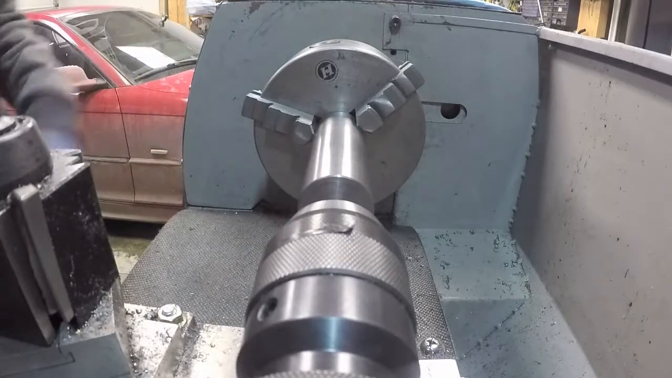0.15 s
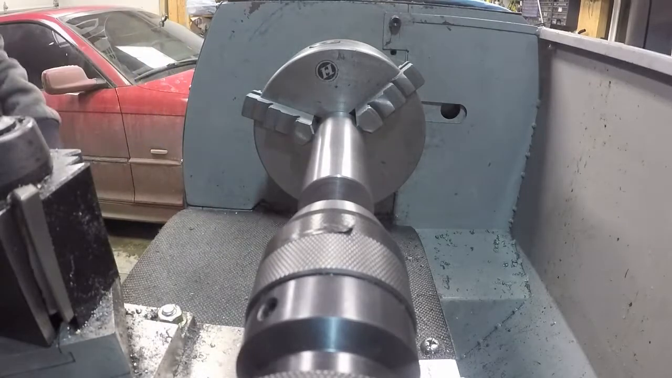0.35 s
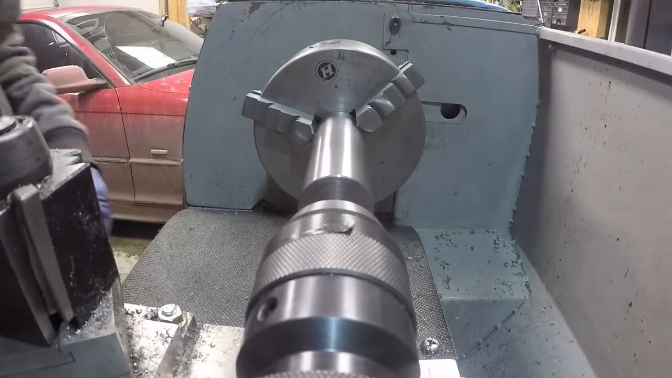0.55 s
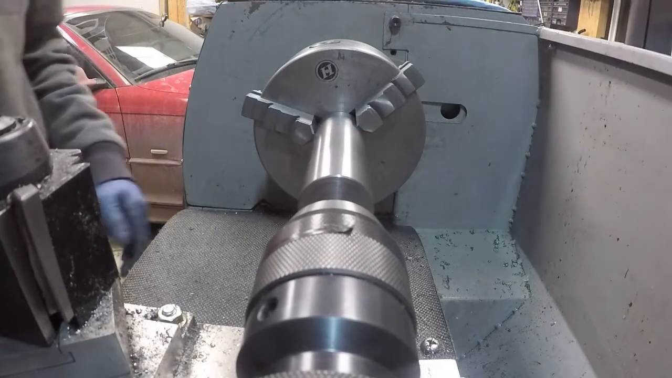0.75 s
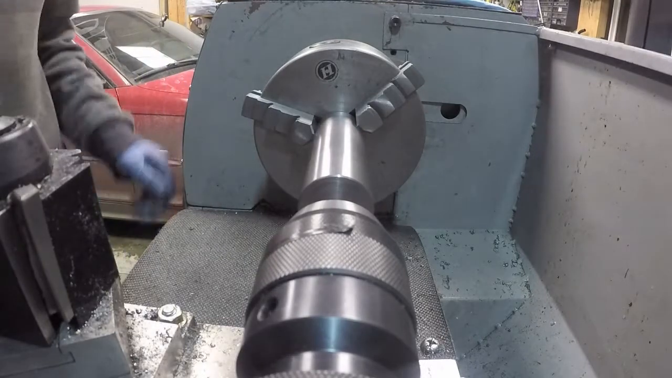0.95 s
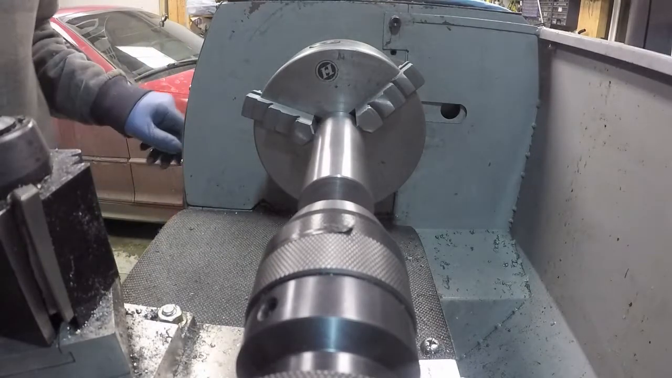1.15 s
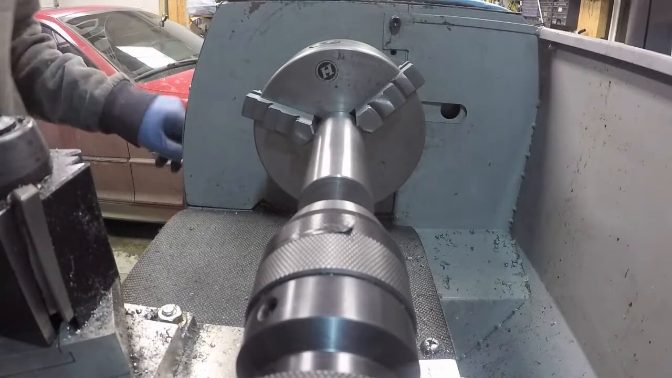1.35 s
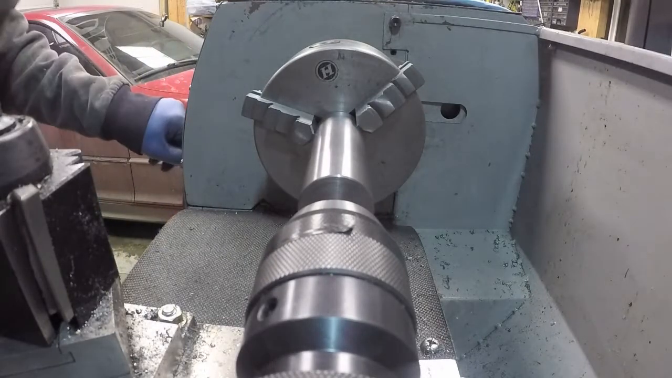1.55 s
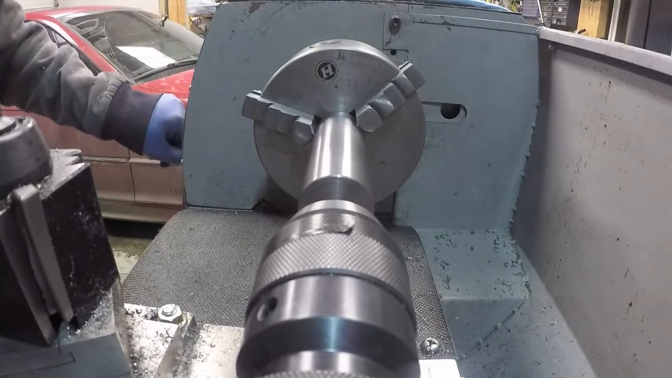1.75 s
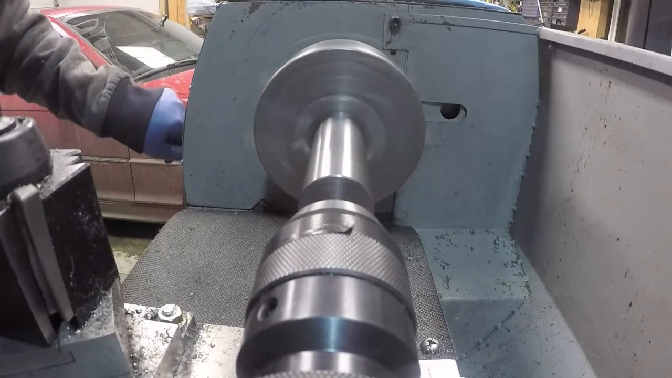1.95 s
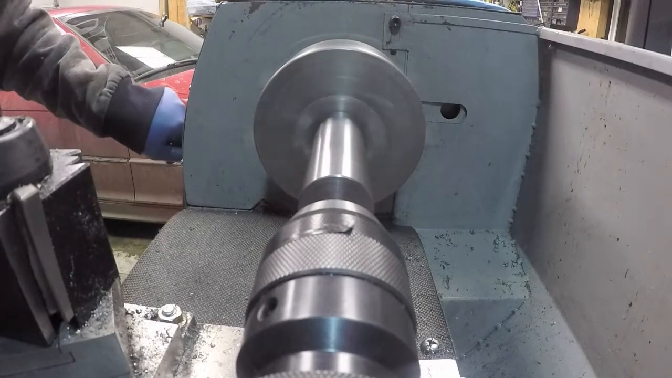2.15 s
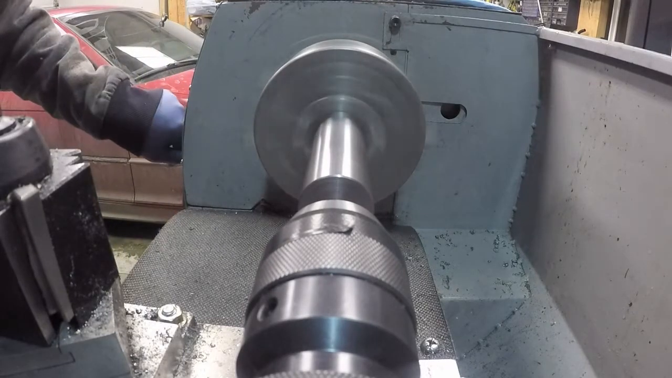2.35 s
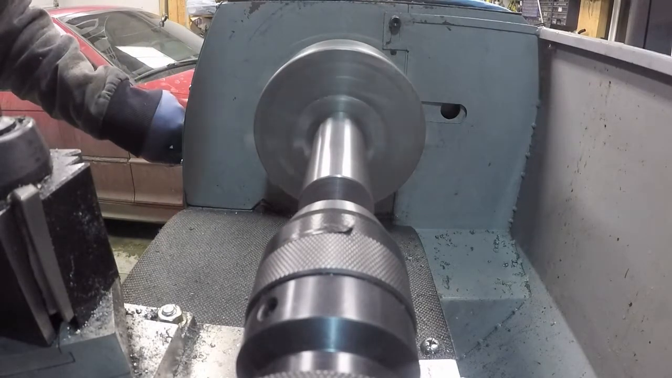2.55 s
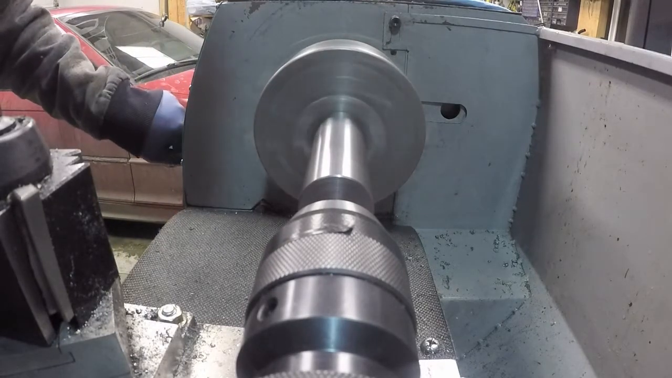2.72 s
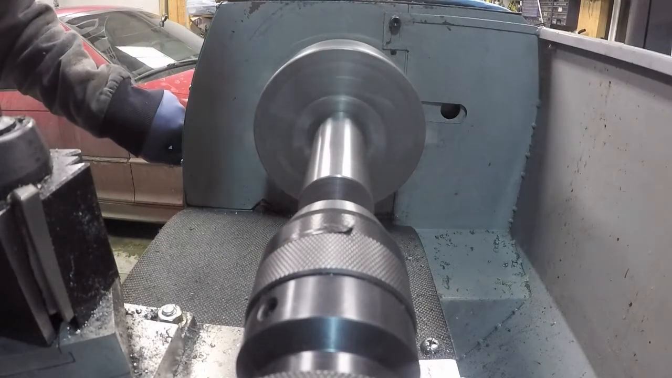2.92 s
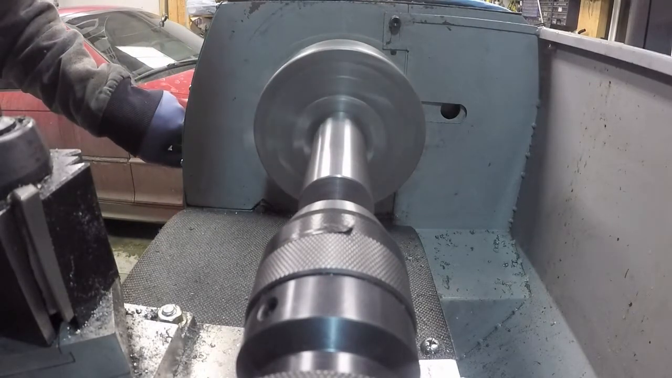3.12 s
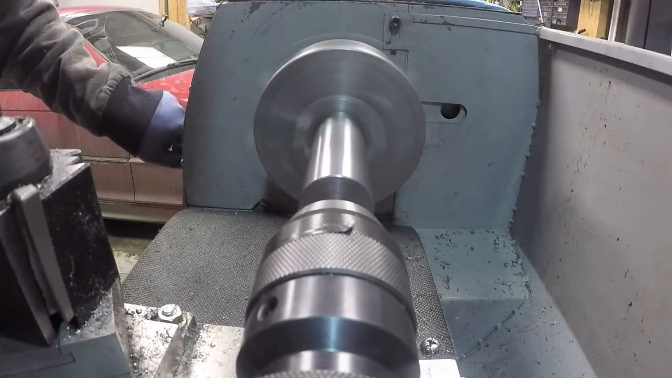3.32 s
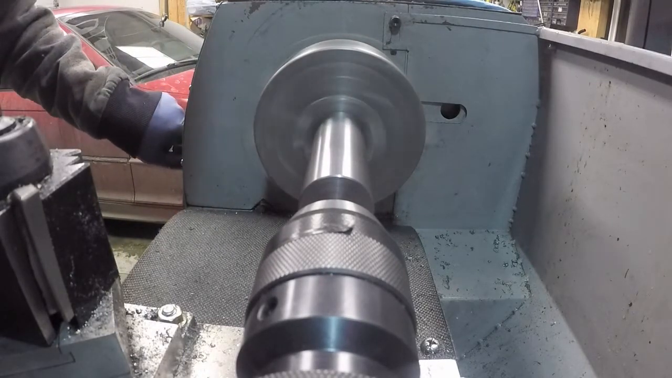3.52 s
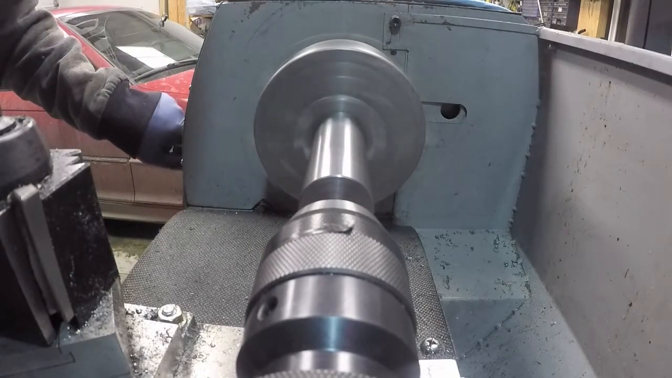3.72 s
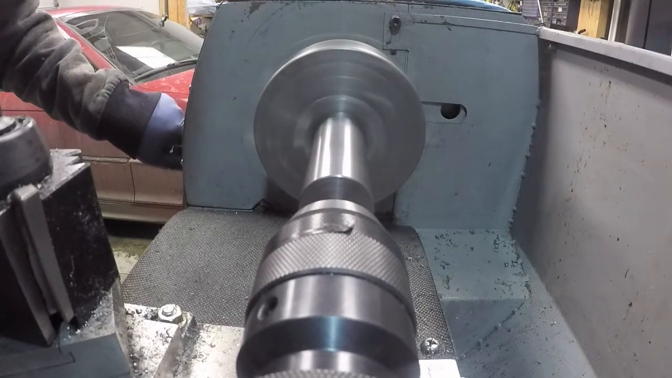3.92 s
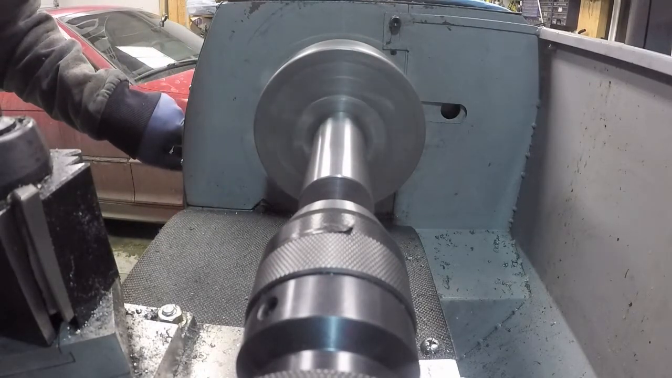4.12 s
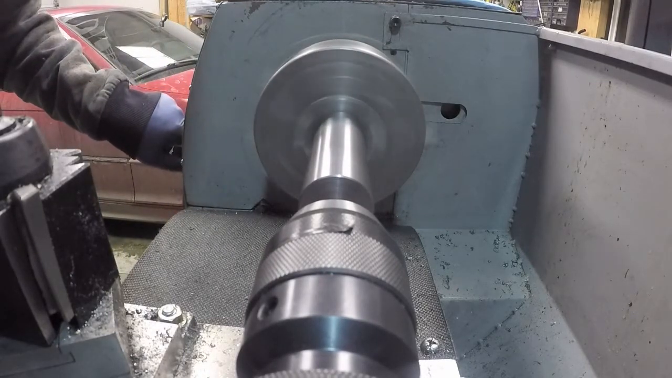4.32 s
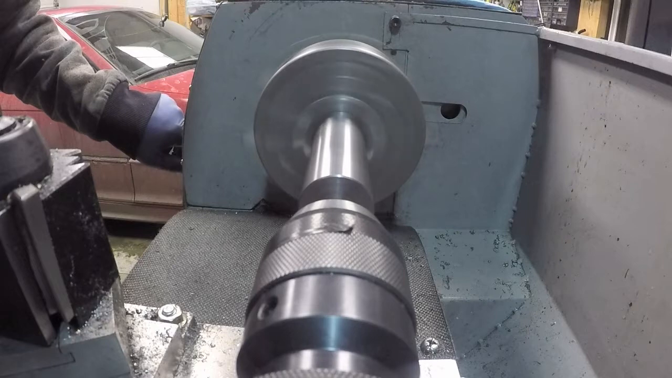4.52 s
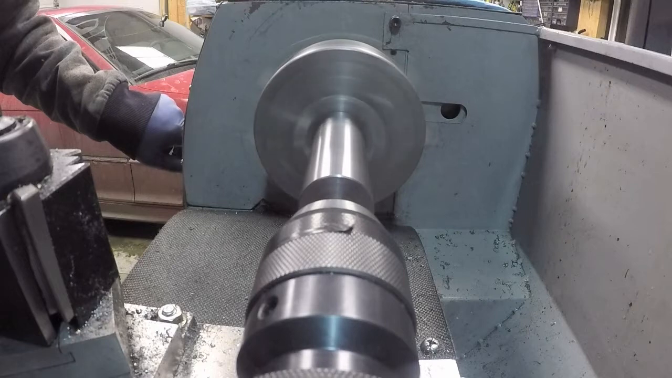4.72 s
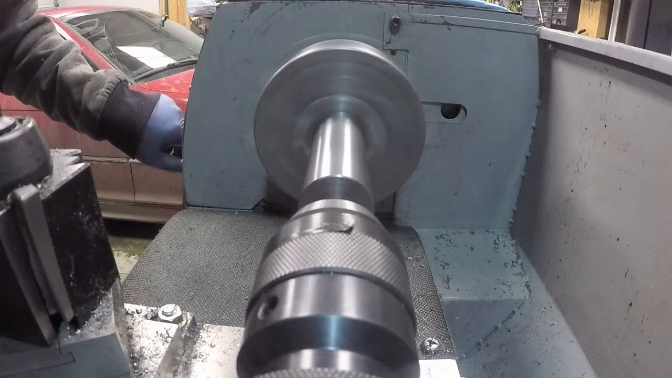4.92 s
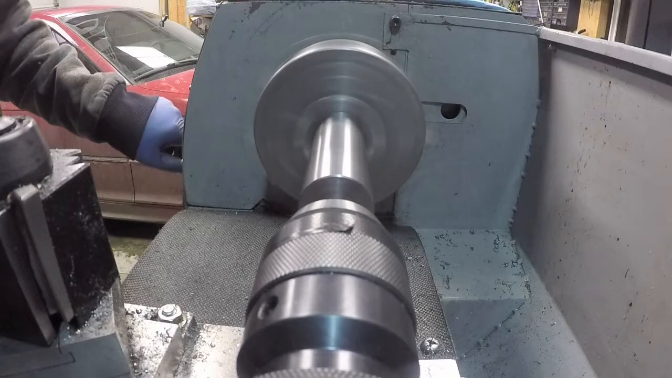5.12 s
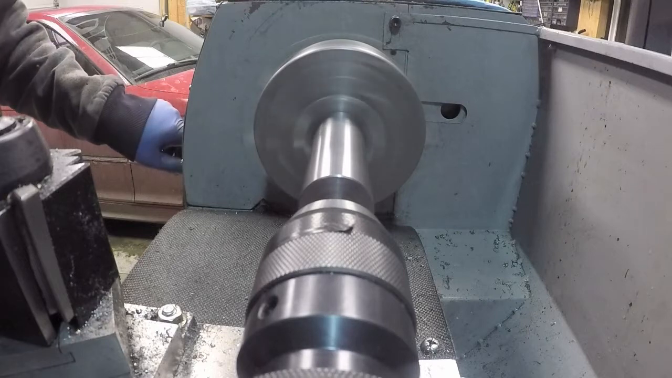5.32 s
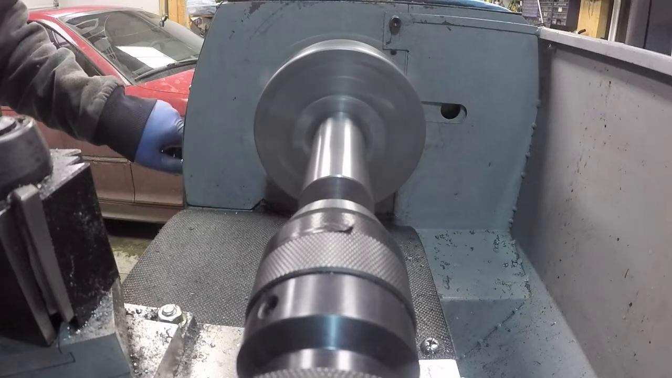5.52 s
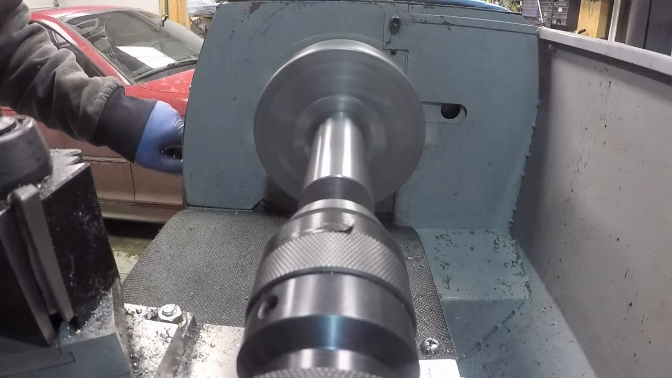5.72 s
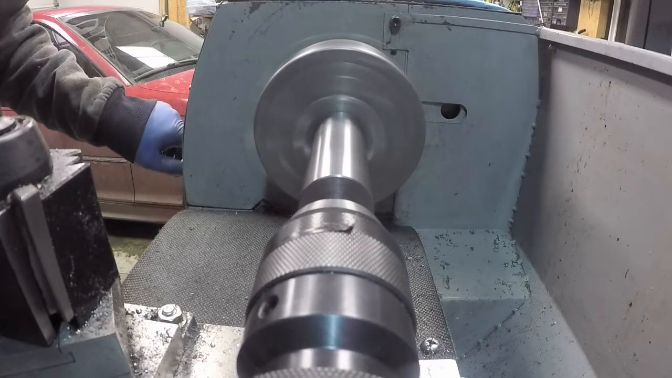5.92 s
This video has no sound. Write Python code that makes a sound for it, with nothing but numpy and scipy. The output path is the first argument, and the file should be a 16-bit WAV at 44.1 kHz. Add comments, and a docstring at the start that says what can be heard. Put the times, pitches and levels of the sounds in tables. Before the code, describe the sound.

Close mono pickup on a metal lathe indoors. First nearly two seconds of faint rumble, soft handling bumps, sleeve rustle and dry clicks. Then a sharp switch snap, a cluster of heavy steel clanks, and an abrupt run-up into a mid-low electric hum. It pulses strongly at first, becomes steadier after three seconds, and continues with grinding gear rattle and steely hiss. Scattered knocks follow, the last one hard, near the end.

```python
"""A soft bump over a low room drone, then sleeve rustle and small ticks as a hand reaches for a lathe's switch.
The switch snaps, the drive takes up its slack with a clank, and the motor is up to speed in a fifth of a second.
A drive tone throbs against the mains hum, over rattling gears, hissing bearings and a few loose knocks.
Tones are summed sines; rustle, rumble, rattle and hiss are shaped noise; knocks are decaying modes plus noise."""
import sys
import numpy as np
from scipy import signal
from scipy.fft import rfft, irfft
from scipy.io import wavfile
from scipy.ndimage import uniform_filter1d, minimum_filter1d

SR = 44100
rng = np.random.default_rng(int(sys.argv[2]) if len(sys.argv) > 2 else 0)


def unload_wav(signal):
    """Save mono or channel-first audio to the path in sys.argv[1] as 16-bit WAV at rate SR, clipped to [-1, 1]."""
    wavfile.write(
        sys.argv[1],
        SR,
        np.round(np.clip(np.atleast_2d(signal).T, -1, 1) * 32767).astype(np.int16),
    )


N = 267246
T = np.arange(N) / SR

# idle workshop spectrum: (frequency [Hz], relative density [dB])
ROOM_SPECTRUM = [(12, -24), (25, 1.5), (34, -1.5), (45, -0.5), (60, 4.5), (80, -18), (130, -19.5),
                 (200, -17.5), (450, -31), (640, -41.5), (1000, -40), (1600, -45), (3000, -44), (6000, -49),
                 (15000, -59.5)]
# sleeve cloth spectrum, also used for ticks: (frequency [Hz], relative density [dB])
CLOTH_SPECTRUM = [(150, -42), (500, -18), (900, -1.5), (1500, -8), (2000, -5.5), (2800, -3), (3900, -4.5),
                  (5500, -8), (7000, -16.5), (10000, -22), (15000, -34)]
# soft body noise spectrum: (frequency [Hz], relative density [dB])
BODY_SPECTRUM = [(65, -26), (110, -15), (140, -3), (183, 3.5), (280, -6.5), (360, -9.5), (440, -4.5),
                 (530, -8.5), (620, -20), (800, -21), (1200, -45), (2600, -68)]
# arm moves: (peak time [s], rise [s], t60 [s], sleeve rustle [dB], body noise [dB])
ARM_MOVES = [(.01, 0.027, 0.89, -72, -39.5), (.17, 0.078, 0.75, -55, -47), (.422, 0.049, 0.28, -48, -58),
             (.49, 0.078, .5, -45.5, -52), (.71, .08, .4, -62, -62), (.89, 0.12, .4, -58.5, -54),
             (.96, .06, .6, -68, -46), (1.08, .04, 0.28, -45.5, -38), (1.2, 0.16, 0.63, -71, -45),
             (1.53, 0.027, 0.44, -48.5, -45), (1.765, 0.25, 0.58, -46.5, -45.5)]
# bright ticks and scuffs at controls and drive: (time [s], level [dB], rise [s], t60 [s], tilt [dB/octave])
BRIGHT_TICKS = [(0.164, -49, 0.003, 0.07, 0), (0.4142, -41, 0.0014, 0.15, -2.5),
                (.457, -41.5, 0.0054, 0.13, 2), (.938, -54, .008, .1, 0), (1.512, -41.5, 0.0015, 0.07, -1),
                (1.543, -47, 0.0033, 0.073, 1), (1.744, -42.5, 0.0037, 0.086, 4),
                (1.8215, -30, .002, 0.12, 4.5), (1.973, -33, .015, 0.12, 8), (2.56, -38, .018, .05, 21),
                (5.446, -33, .0005, .012, 16)]
# soft bumps of the operator against the machine: (time [s], level [dB], frequency [Hz], t60 [s])
SOFT_BUMPS = [(.02, -27, 84.5, 0.24), (1.08, -33.5, 115, 0.15)]
# frame rumble spectrum: (frequency [Hz], relative density [dB])
RUMBLE_SPECTRUM = [(10, -55), (22, -21), (29, -10), (42, -8), (58, 0.5), (68, -8.5), (84, 5.5), (98, -10.5),
                   (110, 2), (135, -11), (225, -15.5), (262, -4), (290, -25.5), (500, -62)]
# gear rattle spectrum: (frequency [Hz], relative density [dB])
GEAR_SPECTRUM = [(130, -25.5), (205, -13), (280, -8), (345, 3), (400, 0), (470, 2), (510, -7), (580, -4),
                 (740, -9.5), (900, -9), (1120, -7), (1210, -20.5), (1350, -28), (6000, -76)]
# bearing hiss spectrum: (frequency [Hz], relative density [dB])
BEARING_SPECTRUM = [(700, -19), (1300, -3), (1620, -8), (1850, 2.5), (2450, -2.5), (2900, 2), (3250, -2),
                    (3650, -1.5), (4300, -3.5), (5700, -6), (6600, -12.5), (7300, -16.5), (11500, -29.5),
                    (13500, -28.5), (15500, -33)]
# steel parts ringing with the bearings: (frequency [Hz], half-width [Hz], level against the hiss [dB])
STEEL_RESONANCES = [(1826, 92, -14.5), (2293, 44, -13), (2595, 50, -10.5), (3060, 48, -13),
                    (3470, 94, -10.5), (4705, 46, -18), (5100, 10, -22), (5610, 83, -20), (6080, 33, -17),
                    (9320, 71, -29)]
# struck headstock, before each knock's focus and length: (frequency [Hz], level [dB], t60 [s])
HEADSTOCK_MODES = [(396.6, 0.5, 0.17), (448, 4.5, 0.043), (523, 2.5, 0.046), (604, 7.5, 0.032),
                   (714, 3.5, 0.049), (853, 6.5, 0.059), (948, -2, 0.043), (965, -16.5, .06),
                   (1176, -31, 0.016), (1880, -18, 0.063), (2100, -37, .04)]
# steely crack spectrum: (frequency [Hz], relative density [dB])
CRACK_SPECTRUM = [(150, -30), (400, 12), (1000, -4), (1500, -3.5), (2000, 4.5), (3200, 0.5), (4200, -7),
                  (5600, -10.5), (7000, -22), (15000, -35)]
# drive knocks: (time [s], ring [dB], ring length [factor], ring centre [Hz],
#                crack [dB], crack t60 [s], crack pitch [Hz])
DRIVE_KNOCKS = [(1.8531, -21, 1, 800, -30, .02, 1100), (1.8567, -6.5, 0.83, 440, -20, 0.05, 450),
                (1.867, -7.5, 1, 710, -14.5, 0.079, 2540), (1.8723, 0.5, 0.63, 1010, -8, 0.04, 1010),
                (1.878, -10, 0.44, 400, -16, 0.11, 2930), (1.902, -12.5, 0.42, 377, -25, 0.062, 3340),
                (2.6347, -25, .3, 900, -6, 0.0089, 2700), (2.6359, -11, 0.38, 690, -17, 0.015, 2750),
                (2.958, -16, 0.4, 745, -27, .01, 1000), (4.86, -12.5, 0.99, 600, -27, .01, 1000),
                (5.322, -14, 0.45, 696, -28, .01, 1000), (5.368, -22, .3, 700, -16, 0.019, 2190),
                (5.833, -14, 0.37, 900, -5.5, 0.0071, 4220), (5.8347, 1, 0.26, 900, -5.5, 0.032, 1880)]
# rotor tones: (order [x shaft rate], sideband [x hum rate])
ROTOR_ORDERS = [(1, 0), (2, 0), (6, 0), (7, 0), (10, 0), (11, 0), (13, 0), (14, 0), (14, 1), (12, 2),
                (12, 3), (30, -1), (30, 1), (30, 2), (30, 3), (30, 4), (30, 5)]
# rotor tones at speed, same order: (mean level [dB])
ROTOR_LEVELS_DB = [-67, -45, -49.5, -37.5, -34.5, -33.5, -30.5, -31.5, -34.5, -32.5, -43, -47, -43.5, -38,
                   -54, -56.5, -50.5]
# magnetic hum other than the beating third harmonic: (harmonic [x hum rate])
HUM_MULTIPLES = [1, 2, 4, 6]
# that hum, same order: (level [dB])
HUM_LEVELS_DB = [-30, -33.5, -39.5, -36.5]

ROOM_DB, ROOM_TONE_HZ, ROOM_TONE_DB = -36, 54.6, -41
WHISTLE_HZ, WHISTLE_DB, FLUTTER_HZ = 12408, -69, 29.97

SHUFFLE_DB = -50.5
# hand sliding along the switch housing
SCRAPE_S, SCRAPE_RISE_S, SCRAPE_DB = 1.53, 0.11, -49
SCRAPE_HZ, SCRAPE_HALF_WIDTH_HZ = 980, 380

# switch closes; drive tone enters and starting strain begins to ease
SWITCH_S, AT_SPEED_S = 1.815, 2.007
MOTOR_ON_S = DRIVE_KNOCKS[0][0]  # with the first knock
SHAFT_HZ, HUM_HZ = 29.75, 120
SPINDLE_HZ = SHAFT_HZ / 3

# steady running
RUMBLE_DB, RATTLE_DB, HISS_DB = -27, -18.5, -30.5
# starting strain adds rumble and rattle
STRAIN_RUMBLE_DB, STRAIN_RATTLE_DB, ATTACK_S, EASE_S = 5.5, 2.5, .06, 0.15
# roughness growing later: (start [s], duration [s], added level [dB])
RUMBLE_GROWTH, RATTLE_GROWTH = (4, 1.1, 5.3), (3.95, 2.26, 3.23)

# drive runs stiffly, slightly slow, then frees itself
FREE_S, FREEING_S, STIFF_LAG_HZ = 3.15, .15, .028
# drone: 12 x shaft rate; beat: third hum harmonic
DRONE_STIFF_DB, DRONE_FREE_DB, DRONE_RISE_S = -14.5, -18, 0.054
BEAT_STIFF_DB, BEAT_FREE_DB, BEAT_RISE_S = -18, -29.5, 0.53
IN_STEP_S = 3.02  # drone and beat swell together
BOOM_S, BOOM_WIDTH_S, BOOM_DB = 5.23, 0.029, 10.5  # one boom of the drone

LOW_CUT_HZ, EDGE_HZ = 15, 15350


def amp(db):
    """Decibels to gain."""
    return 10 ** (np.asarray(db) / 20)


def evened(x):
    """Scales to rms one."""
    return x / np.sqrt(np.mean(x ** 2) + 1e-20)


def coloured(x, spectrum, tilt_db=0):
    """Filters x by a spectrum, tilted in dB per octave about 1 kHz; rms one."""
    octave = np.log2(np.fft.rfftfreq(len(x), 1 / SR) + 1)
    hz, db = np.transpose(spectrum)
    gain_db = np.interp(octave, np.log2(hz), db) + tilt_db * (octave - 10)
    return evened(irfft(rfft(x) * amp(gain_db), len(x)))


def noise_band(hz, half_width_hz):
    """Noise in one resonance; at zero Hz, a slow random drift; rms one."""
    f = np.fft.rfftfreq(N, 1 / SR)
    resonance = 1 / (1 + ((f - hz) / half_width_hz) ** 2)
    return evened(irfft(rfft(rng.standard_normal(N)) * resonance, N))


def tone(turns):
    """Sine of rms one, phase in turns."""
    return np.sqrt(2) * np.cos(2 * np.pi * turns)


def impacts(per_s, spread_db):
    """Random train of small blows of uneven size and either sign; rms one."""
    size = amp(spread_db * np.minimum(rng.exponential(1, N), 4)) * rng.choice([-1, 1], N)
    return evened(size * (rng.random(N) < per_s / SR))


def many_modes(x, spacing_hz, depth_db):
    """A casting's countless close modes ripple the spectrum of what passes through it."""
    f = np.fft.rfftfreq(N, 1 / SR)
    ripple_db = depth_db * np.interp(f / spacing_hz, np.arange(N), rng.standard_normal(N))
    return evened(irfft(rfft(x) * amp(ripple_db), N))


def ramp(start_s, length_s):
    """Climbs from zero to one and stays."""
    return np.clip((T - start_s) / length_s, 0, 1)


def decay(t, t60_s):
    """Exponential decay, down 60 dB at t60."""
    return np.exp(-np.log(1000) * t / t60_s)


def stroke(t, rise_s, t60_s):
    """Straight rise up to time zero, then a decay."""
    return np.clip(1 + t / rise_s, 0, 1) * decay(np.maximum(t, 0), t60_s)


def add(mix, s, sound):
    """Mixes a sound in at time s."""
    part = mix[max(round(s * SR), 0):][:len(sound)]
    part += sound[:len(part)]


def workshop(tone_half_width_hz=5):
    """Low room drone of shaped noise, and a faint fluttering whistle of electronics."""
    room = amp(ROOM_DB) * coloured(rng.standard_normal(N), ROOM_SPECTRUM)
    room_tone = amp(ROOM_TONE_DB) * noise_band(ROOM_TONE_HZ, tone_half_width_hz)
    flutter = evened(np.maximum(tone(FLUTTER_HZ * T) + .6, 0))
    return room + room_tone + amp(WHISTLE_DB) * flutter * tone(WHISTLE_HZ * T)


def operator(crumple_db=1.0):
    """Cloth fibres rub in uneven clumps; the hand bumps, scuffs and snaps the controls."""
    rustle_gain, body_gain = np.zeros(N), np.full(N, amp(SHUFFLE_DB))
    for s, rise_s, t60_s, rustle_db, body_db in ARM_MOVES:
        shape = stroke(T - s, rise_s, t60_s)
        rustle_gain = np.hypot(rustle_gain, amp(rustle_db) * shape)
        body_gain = np.hypot(body_gain, amp(body_db) * shape)
    fibres = impacts(per_s=2500, spread_db=1.0) * amp(crumple_db * noise_band(0, 50))
    out = rustle_gain * coloured(fibres, CLOTH_SPECTRUM)
    out += body_gain * coloured(rng.standard_normal(N), BODY_SPECTRUM)
    scrape = noise_band(SCRAPE_HZ, SCRAPE_HALF_WIDTH_HZ)
    out += amp(SCRAPE_DB) * ramp(SCRAPE_S, SCRAPE_RISE_S) * scrape
    out *= 1 - ramp(SWITCH_S, 0.013)  # hand comes to rest on the switch
    t = T[:SR // 4]
    for s, db, rise_s, t60_s, tilt_db in BRIGHT_TICKS:
        tick = coloured(rng.standard_normal(len(t)), CLOTH_SPECTRUM, tilt_db)
        add(out, s, amp(db) * stroke(t - rise_s, rise_s, t60_s) * tick)
    for s, db, hz, t60_s in SOFT_BUMPS:
        add(out, s, amp(db) * np.minimum(t / 0.0049, 1) * decay(t, t60_s) * tone(hz * t))
    return out


def running_levels():
    """Gains: rumble and rattle follow the strain and grow later; hiss follows the run-up."""
    on, strain = ramp(SWITCH_S, ATTACK_S), 1 - ramp(AT_SPEED_S, EASE_S)
    more_rumble_db, more_rattle_db = [db * ramp(s, length_s)
                                      for s, length_s, db in (RUMBLE_GROWTH, RATTLE_GROWTH)]
    rumble = on * amp(RUMBLE_DB + STRAIN_RUMBLE_DB * strain + more_rumble_db)
    rattle = on * amp(RATTLE_DB + STRAIN_RATTLE_DB * strain + more_rattle_db)
    hiss = amp(HISS_DB) * ramp(SWITCH_S, AT_SPEED_S - SWITCH_S)
    return rumble, rattle, hiss


def drive_train(wobble_db=-0.04, shake_db=0.34, uneven_db=1.38, hiss_share=0.52):
    """Gear teeth rattle the casting, bearings hiss; load swings with each spindle and motor turn."""
    rumble, rattle, hiss = running_levels()
    load_db = wobble_db * tone(SPINDLE_HZ * T) + shake_db * tone(SHAFT_HZ * T)
    load_db += uneven_db * noise_band(0, 7.7)
    teeth = impacts(per_s=900, spread_db=2.0) + 0.65 * rng.standard_normal(N)
    balls = impacts(per_s=6000, spread_db=1.0) + 0.45 * teeth
    balls = many_modes(balls, spacing_hz=29.62, depth_db=2.3)
    steel = sum(amp(db) * noise_band(hz, half_width_hz) for hz, half_width_hz, db in STEEL_RESONANCES)
    frame = rumble * coloured(rng.standard_normal(N), RUMBLE_SPECTRUM)
    casting = many_modes(teeth, spacing_hz=8, depth_db=1.0)
    gears = rattle * coloured(casting * amp(load_db), GEAR_SPECTRUM)
    bearings = evened(coloured(balls, BEARING_SPECTRUM) + steel)
    return frame + gears + hiss * amp(hiss_share * load_db) * bearings


def knocks(contact_s=0.0011, ping=0.98, ping_half_width_hz=180, focus_db_per_octave=6):
    """Slack parts strike: headstock modes nearest the blow's pitch are favoured, under a steely crack."""
    out, t = np.zeros(N), T[:SR // 4]
    for s, ring_db, length, ring_hz, crack_db, crack_t60_s, crack_hz in DRIVE_KNOCKS:
        ring = np.zeros(len(t))
        for hz, db, t60_s in HEADSTOCK_MODES:
            mode_db = db - focus_db_per_octave * abs(np.log2(hz / ring_hz))
            ring += amp(mode_db) * decay(t, t60_s * length) * np.sin(2 * np.pi * hz * t)
        crack = coloured(rng.standard_normal(len(t)), CRACK_SPECTRUM)
        crack = evened(crack + ping * noise_band(crack_hz, ping_half_width_hz)[:len(t)])
        crack *= decay(t, crack_t60_s)
        blow = amp(ring_db) * ring + amp(crack_db) * crack
        add(out, s, blow * np.minimum(t / contact_s, 1))
    return out


def motor(waver=0.3, slip_turns=0.00065, run_up_s=.17):
    """Rotor tones and magnetic hum; the drone lies about 3 Hz under the third hum harmonic: they throb."""
    since_on_s = T - MOTOR_ON_S
    speed, free = np.clip(since_on_s / run_up_s, 0, 1), ramp(FREE_S, FREEING_S)
    shaft = np.cumsum(speed * (SHAFT_HZ - STIFF_LAG_HZ * (1 - free))) / SR  # turns
    shaft = shaft - np.interp(IN_STEP_S, T, shaft) + slip_turns * noise_band(0, 8.7)
    mains = HUM_HZ * (T - IN_STEP_S)  # turns
    boom_db = BOOM_DB * np.exp(-((T - BOOM_S) / BOOM_WIDTH_S) ** 2)
    drone_db = DRONE_STIFF_DB * (1 - free) + DRONE_FREE_DB * free + boom_db
    beat_db = BEAT_STIFF_DB * (1 - free) + BEAT_FREE_DB * free
    out = ramp(AT_SPEED_S, DRONE_RISE_S) * amp(drone_db) * tone(12 * shaft)
    out += ramp(AT_SPEED_S, BEAT_RISE_S) * amp(beat_db) * tone(3 * mains)
    for (order, side), db in zip(ROTOR_ORDERS, ROTOR_LEVELS_DB):
        level = speed ** 2 * amp(db) * (1 + waver * noise_band(0, 1.4))
        out += level * tone(order * shaft + side * mains + rng.random())
    for k, db in zip(HUM_MULTIPLES, HUM_LEVELS_DB):
        out += amp(db) * tone(k * mains + rng.random())
    return out * np.clip(since_on_s / 0.021, 0, 1)


def scene():
    """Sum of all sources, one channel."""
    return (workshop() + operator() + drive_train() + knocks() + motor())[None]


def record(dry):
    """Low cut, fast limiter on peaks above full scale, then the band limit."""
    x = signal.sosfilt(signal.butter(4, LOW_CUT_HZ, "high", fs=SR, output="sos"), dry)
    gain = minimum_filter1d(1 / np.maximum(abs(x), 1), size=11)
    gain = uniform_filter1d(gain, size=11)
    low_pass = signal.firwin(511, EDGE_HZ, window=("kaiser", 9), fs=SR)
    return signal.oaconvolve(x * gain, low_pass[None], "same")


dry = scene()
out = record(dry)
unload_wav(out)
```